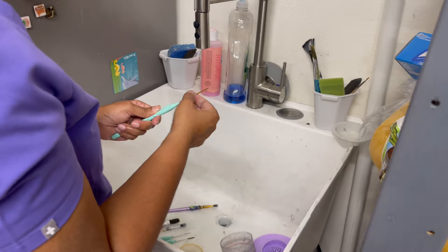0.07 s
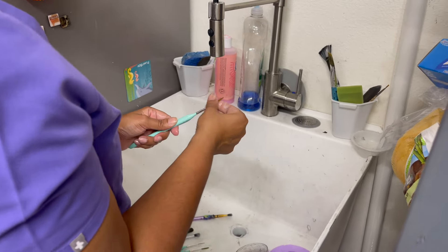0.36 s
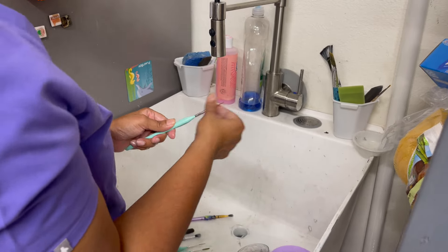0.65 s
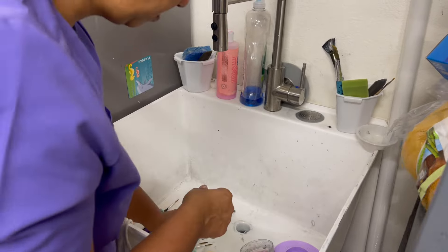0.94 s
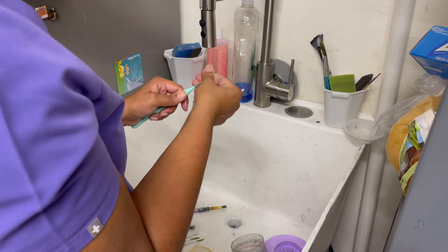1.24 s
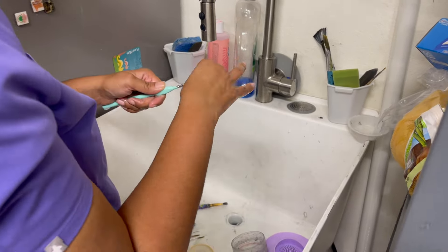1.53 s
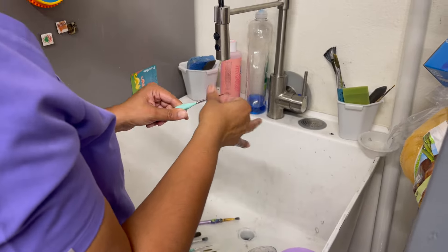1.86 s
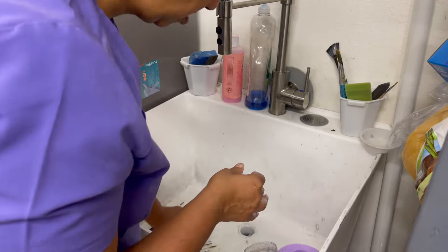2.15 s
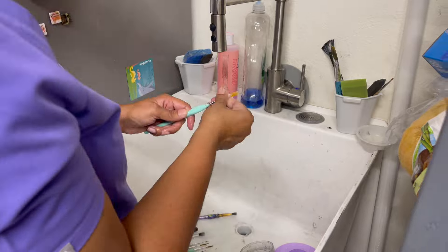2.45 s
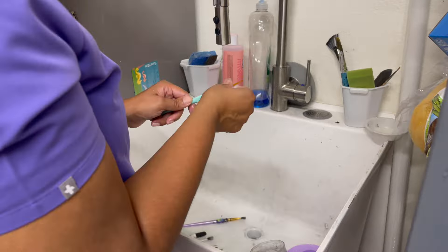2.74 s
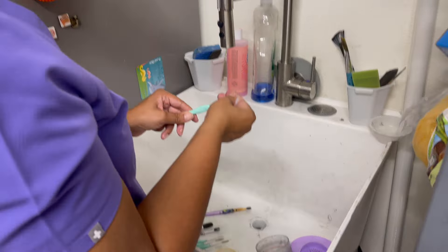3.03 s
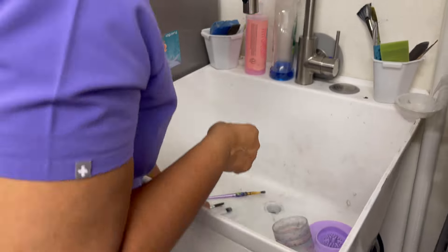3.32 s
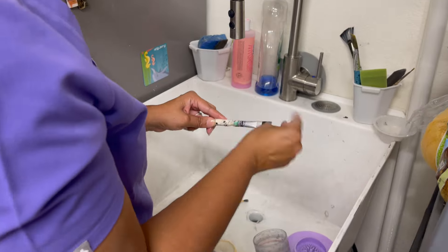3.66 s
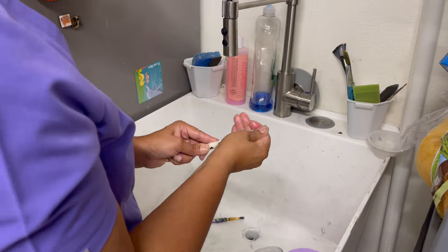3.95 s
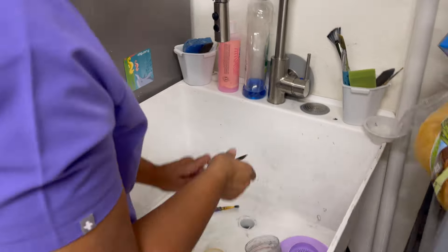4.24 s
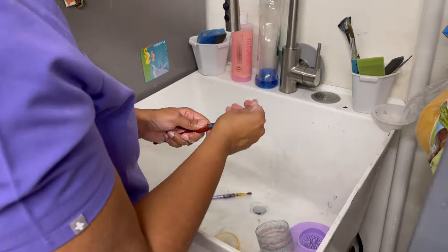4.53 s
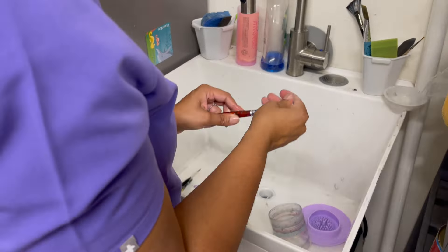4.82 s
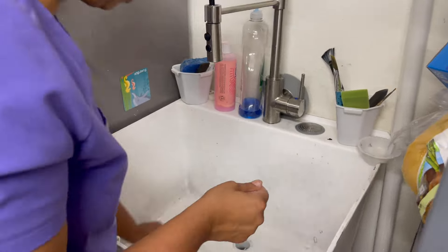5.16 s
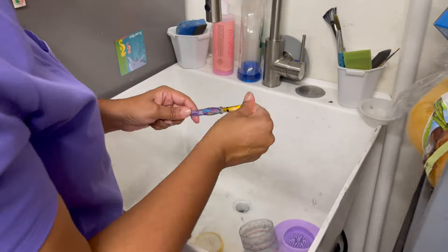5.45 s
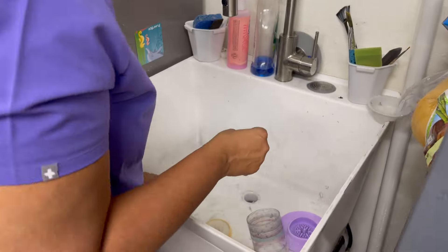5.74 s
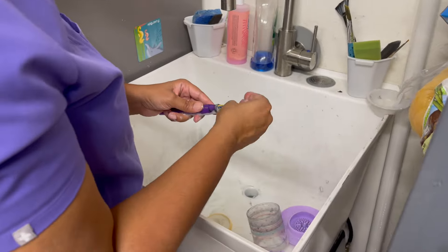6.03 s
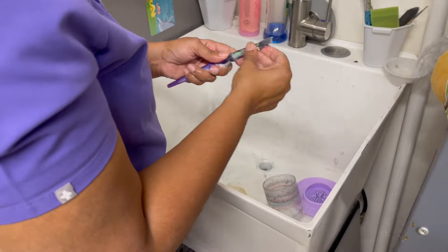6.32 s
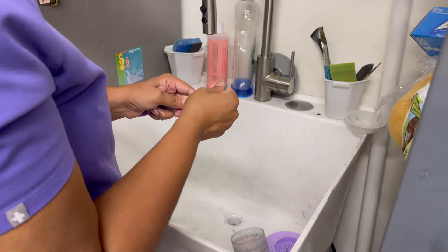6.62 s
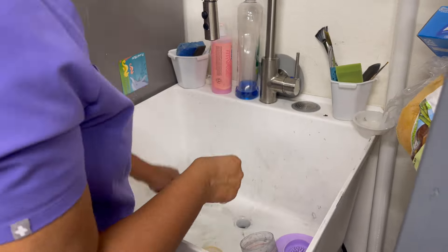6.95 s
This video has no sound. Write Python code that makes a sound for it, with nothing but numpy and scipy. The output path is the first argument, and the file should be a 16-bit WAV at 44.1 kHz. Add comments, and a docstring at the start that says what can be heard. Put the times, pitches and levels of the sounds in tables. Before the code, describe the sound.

A faint ventilation hiss and electrical hum run throughout, in a small room with little echo. Close by, wet paintbrushes drop into a deep plastic sink, each making a quick cluster of hollow knocks, handle clacks and thin metal ticks. A light clatter comes at 0.8 seconds, a soft finger tap at 1.6, and a sharper clatter at 2.1. Tiny bristle squeaks occur near 0.3, 1.7, 2.2 and 3.6. After a click at 3.0, a brush skids at 3.2, then rattles and rubs until 3.4, trailed by a faint high fizz. A sharp, prominent drop lands at 4.2. Small finger taps and wet clicks scatter from there to about 6.1, around clatters at 5.2 and 5.7 and a lighter knock at 5.4. A last strong clatter at 6.8 is followed by faint fizz and a soft tap.

```python
"""Wet paintbrushes clatter into a deep plastic sink, picked up, worked by hand and dropped back.
Each drop is a quick run of contacts: basin modes knock, handle modes clack, the metal ferrule ticks.
In between, bristles squeak and rub in tiny slips and fingers tap the brushes faintly.
A faint high fizz trails two clatters. Ventilation hiss and mains hum fill the small room."""
import sys
import numpy as np
from scipy import signal
from scipy.fft import rfft, irfft
from scipy.io import wavfile

SR = 44100
rng = np.random.default_rng(int(sys.argv[2]) if len(sys.argv) > 2 else 0)


def transcribe(u):
    """Save the signal u as a 16-bit wav file named by the first command-line argument.

    u: samples, shape (n,) or (channels, n), limited to [-1, 1]; the rate is SR.
    q: integer samples, one column per channel.
    """
    v = np.clip(np.atleast_2d(u).T, -1, 1)
    q = np.round(v * 32767).astype(np.int16)
    wavfile.write(sys.argv[1], SR, q)


N = 316814
TIME_S, BIN_HZ = np.arange(N) / SR, np.fft.rfftfreq(N, 1 / SR)
AGE_S = np.arange(4096) / SR   # time since a contact


def amp(db):
    """dB to gain."""
    return 10 ** (np.asarray(db) / 20)


def unit_rms(x):
    """Scale to rms 1."""
    return x / np.sqrt(np.mean(x ** 2) + 1e-20)


def unit_blow(x):
    """Scale a contact to the energy of 5 ms at rms 1."""
    return unit_rms(x) * np.sqrt(.005 / AGE_S[-1])


def band(x, low_hz, high_hz):
    """Causal band-pass."""
    edges_hz = [min(low_hz, .4 * SR), min(high_hz, .45 * SR)]
    return signal.sosfilt(signal.butter(2, edges_hz, "band", fs=SR, output="sos"), x)


def band_around(x, hz, octaves):
    """Band-pass by centre and width."""
    return band(x, hz / 2 ** (octaves / 2), hz * 2 ** (octaves / 2))


def spectrum(points):
    """Interpolate (f, value) points onto the FFT bins over log f."""
    hz, values = np.transpose(points)
    return np.interp(np.log(BIN_HZ + 1), np.log(hz), values)


def drift(rate_hz):
    """Slow noise, rms 1."""
    return unit_rms(irfft(rfft(rng.standard_normal(N)) / (1 + (BIN_HZ / rate_hz) ** 2), N))


def stereo(mid, side, coherence):
    """Mix two independent noises into a partly coherent pair."""
    return np.sqrt(1 + coherence) * mid + np.sqrt(1 - coherence) * np.array([side, -side])


def add(track, t_s, sound):
    """Mix a sound in at t_s."""
    start = int(t_s * SR)
    track[:, start:start + sound.shape[-1]] += sound[..., :N - start]


# hiss spectrum: f/Hz, relative density/dB
HISS_SPECTRUM = [(40, -42), (130, -44.5), (240, -19), (310, -14), (400, -2.5), (550, -1.5), (750, -6),
                 (1200, -9.5), (1450, -12.5), (2900, -16), (5200, -23.5), (9500, -26), (12000, -29.5),
                 (15500, -31.5)]
# hiss resonances: f/Hz, width/Hz, boost/dB
HISS_RESONANCES = [(239.7, 9.7, 5), (1700, 100, 1.5), (2470, 59, 1.5), (3590, 37, 0), (4430, 120, 2),
                   (4830, 210, 3), (5960, 220, 5.5), (6740, 500, 4), (7920, 250, 6.5), (8800, 200, 3)]
# hiss left-right coherence: f/Hz, coherence/0-1
HISS_COHERENCE = [(100, 1), (400, 0.92), (1400, 0.97), (3000, 0.91), (5500, 0.03), (15000, 0.92)]


def ventilation(level_db=-56, flutter_db=.46):
    """Moving air: broad hiss coloured by resonances."""
    peaks_db = sum(db * np.exp(-((BIN_HZ - hz) / width_hz) ** 2) for hz, width_hz, db in HISS_RESONANCES)
    mid, side = rfft(rng.standard_normal((2, N))) * amp(spectrum(HISS_SPECTRUM) + peaks_db)
    hiss = unit_rms(irfft(stereo(mid, side, spectrum(HISS_COHERENCE)), N))
    return amp(level_db + flutter_db * drift(11)) * hiss


# mains hum lines: f/Hz, level/dB
HUM_LINES = [(480, -63), (601, -64.5), (721, -65.5), (962, -69), (1202, -66.5), (1922, -71.5), (2163, -75),
             (2681, -75), (3521, -78), (4091, -81), (8037, -94), (11600, -91)]


def mains_hum(waver_db=3.0, wander_rad=.78):
    """Each line wavers in level and phase."""
    return sum(amp(db + waver_db * drift(2.7)) * np.sin(2 * np.pi * hz * TIME_S + wander_rad * drift(4.1))
               for hz, db in HUM_LINES)


# fingers squeezing bristles: mid t/s, level/dB
BRISTLE_SQUEEZES = [(0.264, -61.5), (1.742, -60), (2.179, -59.5), (3.634, -58.5)]
# brush rubbing on basin or hand: mid t/s, half length/s, level/dB, f/Hz, width/oct
BRUSH_RUBS = [(0.85, 0.029, -53, 2800, 1.4), (3.18, .024, -41.5, 2130, .3), (3.366, .01, -53, 6800, .9),
              (3.384, .015, -50.5, 5500, 0.46), (3.383, .04, -55, 2590, .6), (3.406, .006, -47, 2680, 0.34),
              (3.421, .0094, -44.5, 2600, 0.4), (5.799, .04, -62, 3400, 0.96),
              (6.775, .012, -57, 4750, 0.65)]
# thin fizz after two clatters: mid t/s, level/dB, f/Hz
HIGH_FIZZES = [(3.452, -62, 14900), (6.883, -64, 14300)]


def squeaks_rubs_and_fizz(squeak_hz=4000, narrow_oct=.17, crackle_db=-63,
                          tone_grain_db=-.5, crackle_grain_db=7.5):
    """Narrow noise bands swell and fade: bristle squeaks, brush rubs and two faint high fizzes."""
    out = np.zeros((2, N))
    squeezes = [(t_s, .03, db, squeak_hz, narrow_oct) for t_s, db in BRISTLE_SQUEEZES]
    fizzes = [(t_s, .06, db, hz, narrow_oct) for t_s, db, hz in HIGH_FIZZES]
    for mid_s, half_s, db, hz, octaves in squeezes + BRUSH_RUBS + fizzes:
        size = int(2 * half_s * SR)
        noise, grain = rng.standard_normal((2, size))
        tone = unit_rms(band_around(noise * amp(tone_grain_db * grain), hz, octaves))
        crackle = unit_rms(band(noise * amp(crackle_grain_db * grain), 3200, 9400))
        add(out, mid_s - half_s, (amp(db) * tone + amp(crackle_db) * crackle) * np.hanning(size))
    return out


def struck(modes, centre_hz, reach_oct, detune, scatter_db, spread_rad):
    """Decaying modes; the place and hardness of the blow favour those near centre_hz."""
    hz, db, t60_s = np.transpose(modes)
    shift, strength, phase = rng.standard_normal((3, len(hz)))
    weight = amp(db + scatter_db * strength) / (1 + (np.log2(hz / centre_hz) / reach_oct) ** 2)
    angle = 2 * np.pi * np.outer(hz * (1 + detune * shift), AGE_S) + spread_rad * phase[:, None]
    return weight @ (np.sin(angle) * amp(-60 * AGE_S / t60_s[:, None]))


def crack(t60_s, tail_db, tail_t60_s, coherence, rise_s=.00017):
    """A sharp noise burst, then its scatter between the basin walls."""
    decay = amp(-60 * AGE_S / t60_s) + amp(tail_db - 60 * AGE_S / tail_t60_s)
    mid, side = rng.standard_normal((2, len(AGE_S)))
    return stereo(mid, side, coherence) * decay * (1 - np.exp(-AGE_S / rise_s))


# plastic basin modes: f/Hz, relative level/dB, T60/s
BASIN_MODES = [(470, -17, .035), (630, -5.5, 0.07), (765, -11, 0.032), (882, -2.5, 0.037),
               (1029, 1.5, 0.028), (1218, 2, 0.019), (1445, 4, 0.016), (1646, 2, 0.014)]


def basin_knock(centre_hz, corner_hz=946, low_delay_s=.00311):
    """Bending waves disperse in the thin wall: lows arrive late, so the knock falls in pitch."""
    modes = struck(BASIN_MODES, centre_hz, reach_oct=.5, detune=.034, scatter_db=4, spread_rad=1)
    wall = band(modes, 593, 2260)
    size = len(wall)
    hz = np.fft.rfftfreq(2 * size, 1 / SR)
    delay_s = low_delay_s / (1 + (hz / corner_hz) ** 4)
    dispersion = np.exp(-2j * np.pi * np.cumsum(delay_s) * hz[1])
    return unit_blow(irfft(rfft(wall, 2 * size) * dispersion)[:size])


# brush handle modes: f/Hz, relative level/dB, T60/s
HANDLE_MODES = [(2090, 1.5, 0.016), (2460, 1.5, 0.022), (2900, -10.5, 0.014), (3094, -4.5, 0.013),
                (3376, -6, 0.02), (3970, 1, 0.01), (4416, -7.5, 0.022), (5500, -8, 0.0041),
                (5900, -23, 0.012), (7250, 7, 0.01), (7600, 4.5, 0.0099)]


def handle_clack(centre_hz, grit_db=-6):
    """The handle rings briefly over gritty contact noise."""
    modes = struck(HANDLE_MODES, centre_hz, reach_oct=.43, detune=.037, scatter_db=-1.5, spread_rad=.95)
    ring = unit_blow(band(modes, 1400, 9200))
    burst = crack(t60_s=.013, tail_db=-7, tail_t60_s=.042, coherence=.78)
    grit = unit_blow(band(burst, .71 * centre_hz, 2 * centre_hz))
    return unit_blow(ring + amp(grit_db) * grit)


def ferrule_tick(blow_db, medium_db=-34, medium_hz=10100, oct_per_db=.03, thump_db=-31):
    """The metal ticks higher on a harder blow to the handle, over a faint low thump."""
    hz = medium_hz * 2 ** (oct_per_db * (blow_db - medium_db))
    sharp = crack(t60_s=.0059, tail_db=-12, tail_t60_s=.033, coherence=.58)
    dull = crack(t60_s=.02, tail_db=-20, tail_t60_s=.05, coherence=.26)
    tick = unit_blow(band_around(sharp, hz, octaves=1))
    thump = amp(thump_db) * unit_blow(band(dull, 15, 640))
    return tick + thump * amp([[3], [-3]])


# brush hitting the sink: t/s, basin level/dB, handle level/dB, ferrule level/dB,
# basin f/Hz, handle f/Hz, left-right/dB, rebound count, first rebound gap/s
SINK_STRIKES = [(0.8056, -42, -43, -41, 1250, 3700, 3, 1, .0037),
                (0.8313, -46, -52, -67, 1150, 2700, 0, 0, 0), (0.847, -55, -54, -55, 1150, 3700, 3, 0, 0),
                (2.0456, -41, -34.5, -33, 1130, 3600, 0, 1, .0104),
                (2.0657, -32.5, -32.5, -35, 1140, 5100, 2, 2, 0.0066),
                (2.095, -43.5, -49.5, -57, 1050, 2800, 1, 0, 0),
                (3.2865, -37, -40.5, -46, 930, 3300, 1, 1, 0.0075),
                (3.2988, -44, -34.5, -34.5, 1280, 3800, 1, 2, 0.0064),
                (3.317, -45, -39, -36.5, 1300, 3240, 1, 0, 1),
                (3.3268, -28, -39, -52, 1050, 2750, -1, 0, 0),
                (3.3504, -33, -46.5, -51, 1090, 3300, 1, 0, 0),
                (4.1943, -31, -22, -31.5, 1240, 3550, 0.5, 1, 0.0063),
                (4.2191, -31.5, -44, -57, 1090, 3200, 0, 0, 0),
                (4.2404, -42.5, -46.5, -59, 1030, 3120, 1, 1, 0.01),
                (5.1762, -33, -30.5, -40, 1210, 3340, 0, 0, 0),
                (5.181, -33.5, -31.5, -35.5, 1240, 3800, 0, 0, 0),
                (5.2074, -32.5, -42, -55, 920, 2920, 0, 1, .0065),
                (5.4086, -42, -40.5, -41, 875, 3130, 3, 1, 0.0013),
                (5.7087, -41.5, -51.5, -70, 800, 2800, -1, 0, 0),
                (5.7264, -34, -33.5, -45, 1150, 3030, 1, 2, 0.0084),
                (5.7472, -36.5, -40, -50, 1080, 3400, 0, 0, 0),
                (6.819, -29, -28, -37, 1230, 3250, 2.5, 2, 0.0049),
                (6.8443, -42, -52, -52, 1200, 4300, 4, 0, 0),
                (6.8474, -38.5, -39, -39.5, 950, 4800, 4, 0, 0)]


def strikes(gap_ratio=.8):
    """Yield each strike and its ever quicker, softer, duller rebounds."""
    loss_db = np.array([4, 6.5, 7])   # basin, handle, ferrule
    for t_s, *levels_db, basin_hz, handle_hz, pan_db, rebounds, gap_s in SINK_STRIKES:
        for k in range(1 + round(rebounds)):
            yield t_s, np.array(levels_db) - k * loss_db, basin_hz, handle_hz, pan_db
            t_s += gap_s * gap_ratio ** k


def clatter(contacts, notch_hz=1900, notch_width_hz=330):
    """Each contact sounds basin, handle and ferrule; an anti-resonance parts knock from clack."""
    out = np.zeros((2, N))
    for t_s, (basin_db, handle_db, ferrule_db), basin_hz, handle_hz, pan_db in contacts:
        knock = amp(basin_db) * basin_knock(basin_hz)
        clack = amp(handle_db) * handle_clack(handle_hz)
        tick = amp(ferrule_db) * ferrule_tick(handle_db)
        add(out, t_s, knock + (clack + tick) * amp([[pan_db / 2], [-pan_db / 2]]))
    return signal.lfilter(*signal.iirnotch(notch_hz, notch_hz / notch_width_hz, fs=SR), out)


# finger taps and wet clicks on a brush: t/s, level/dB, f/Hz, width/oct
FINGER_TAPS = [(1.588, -42, 570, 0.77), (2.9784, -46, 3200, 0.79), (4.083, -53.5, 4730, 1.1),
               (4.415, -48, 1140, 1.6), (4.58, -49.5, 890, 1.1), (4.831, -49.5, 1970, 1.2),
               (4.908, -43.5, 3580, 2), (4.939, -52.5, 6500, 2.5), (5.027, -46, 5570, 1.3),
               (5.409, -43, 483, 0.88), (5.9066, -42.5, 4600, 1.02), (6.093, -47.5, 3600, 1.2),
               (6.912, -44, 885, 0.37)]


def finger_taps(extra_taps, t60_cycles=21):
    """Small clicks, damped at once by the hand."""
    out = np.zeros((2, N))
    for t_s, db, hz, octaves in FINGER_TAPS + extra_taps:
        burst = crack(t60_cycles / hz, tail_db=-24, tail_t60_s=.064, coherence=.66)
        add(out, t_s, amp(db) * unit_blow(band_around(burst, hz, octaves)))
    return out


def skid(mid_s=3.183, length_s=.034, count=9, basin_hz=980, handle_hz=3450, pan_db=1.5):
    """Yield the close contacts of a skidding brush, strongest midway."""
    peak_db, fade_db = np.array([-36.5, -40, -36]), np.array([5, 14, 20])   # basin, handle, ferrule
    for place in np.linspace(-1, 1, count) + .1 * rng.uniform(-1, 1, count):
        yield mid_s + place * length_s / 2, peak_db - place ** 2 * fade_db, basin_hz, handle_hz, pan_db


def grip_shifts(span_s=(4.25, 6.15), count=8, level_db=-58.5, hz=3000, width_oct=1.7):
    """Rows of faint random taps as the fingers shift their grip."""
    times_s = rng.uniform(*span_s, count)
    return [(t_s, level_db + .5 * strength, hz * 2 ** (.7 * pitch), width_oct)
            for t_s, (strength, pitch) in zip(times_s, rng.uniform(-1.16, 1, (count, 2)))]


def low_dip(x, mid_s=5.08, half_s=.026, depth=.65, corner_hz=2000):
    """The lows dip briefly."""
    lows = irfft(rfft(x) / (1 + (BIN_HZ / corner_hz) ** 2), N)
    return x - lows * depth * np.exp(-((TIME_S - mid_s) / half_s) ** 2)


def faint_tone(start_s=5.94, end_s=6.43, hz=577, level_db=-58, ramp_s=.03):
    """A sine briefly joins the hum."""
    gate = np.clip(np.minimum(TIME_S - start_s, end_s - TIME_S) / ramp_s, 0, 1)
    return amp(level_db) * gate * np.sin(2 * np.pi * hz * TIME_S)


def room(x, t60_s=.11, level_db=-22, build_s=.009):
    """Short, dull reverberation, independent on each side."""
    t_s = TIME_S[:SR // 2]
    tail = band(rng.standard_normal((2, len(t_s))), 670, 8600) * amp(-60 * t_s / t60_s)
    tail *= 1 - np.exp(-t_s / build_s)
    tail /= np.sqrt(np.sum(tail ** 2, axis=1, keepdims=True))
    return amp(level_db) * signal.fftconvolve(x, tail, axes=1)[:, :N]


def left_first(x, lag_s):
    """Sound reaches the right microphone later."""
    right = irfft(rfft(x[1]) * np.exp(-2j * np.pi * BIN_HZ * lag_s), N)
    return np.array([x[0], right])


def scene():
    """Short sounds and their reverberation over hiss and hum."""
    events = clatter([*strikes(), *skid()]) + finger_taps(grip_shifts()) + squeaks_rubs_and_fizz()
    steady = (ventilation() + mains_hum() + faint_tone()) * amp([[-.4], [.4]])
    return left_first(events, lag_s=8e-6) + room(events) + left_first(low_dip(steady), lag_s=22e-6)


def record(dry, cutoff_hz=16300):
    """Steep low-pass."""
    return signal.sosfilt(signal.ellip(10, .1, 80, cutoff_hz, fs=SR, output="sos"), dry)


dry = scene()
out = record(dry)
transcribe(out)
```